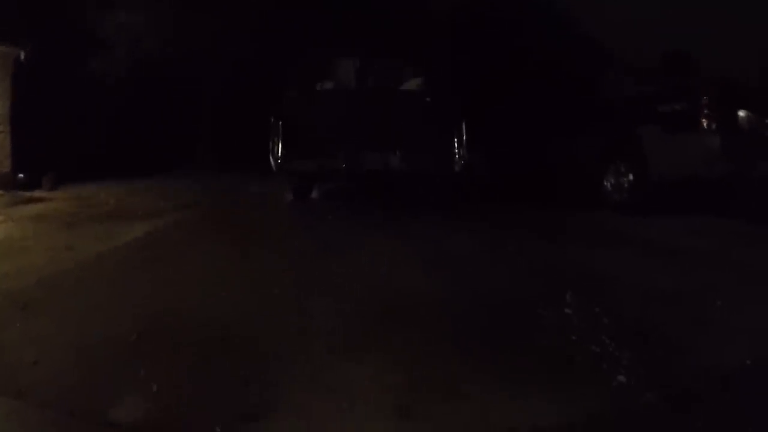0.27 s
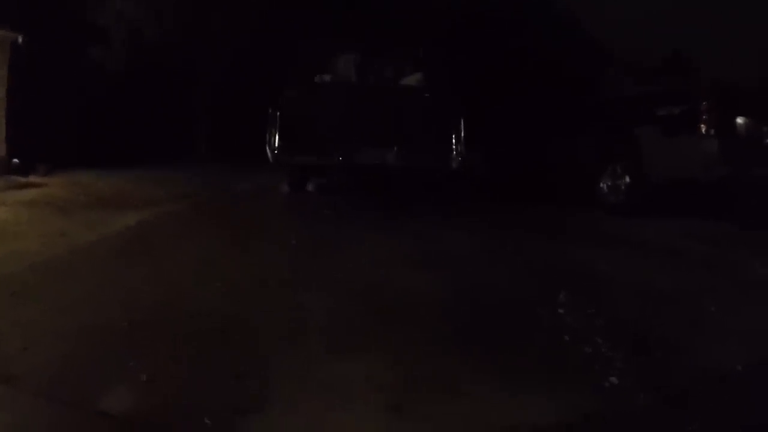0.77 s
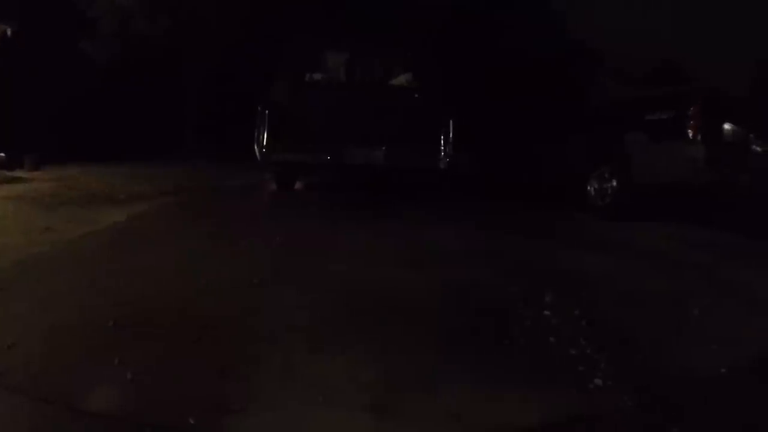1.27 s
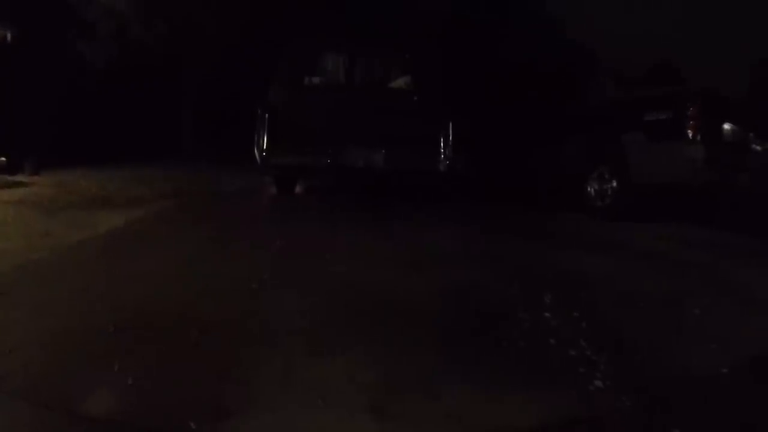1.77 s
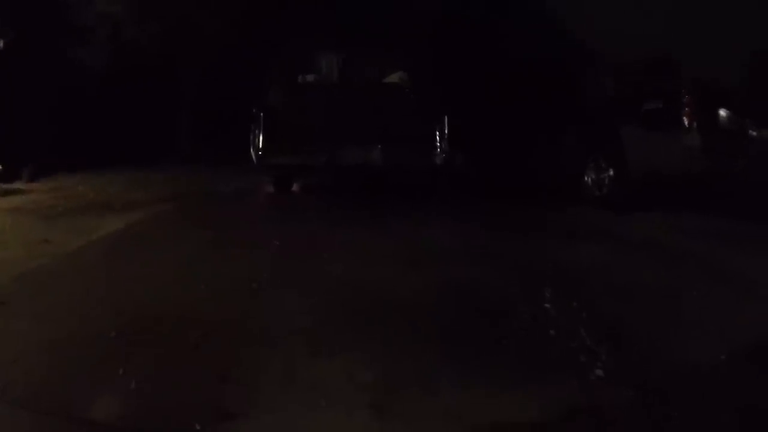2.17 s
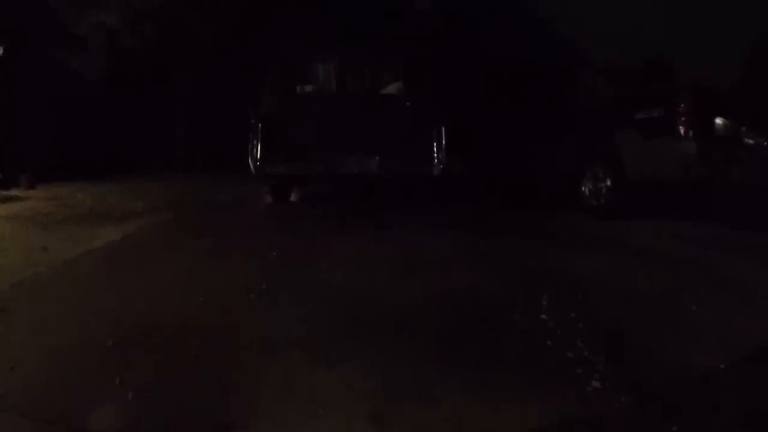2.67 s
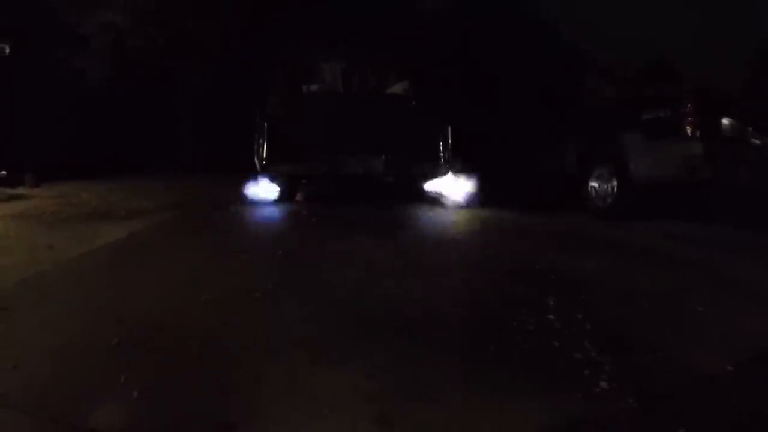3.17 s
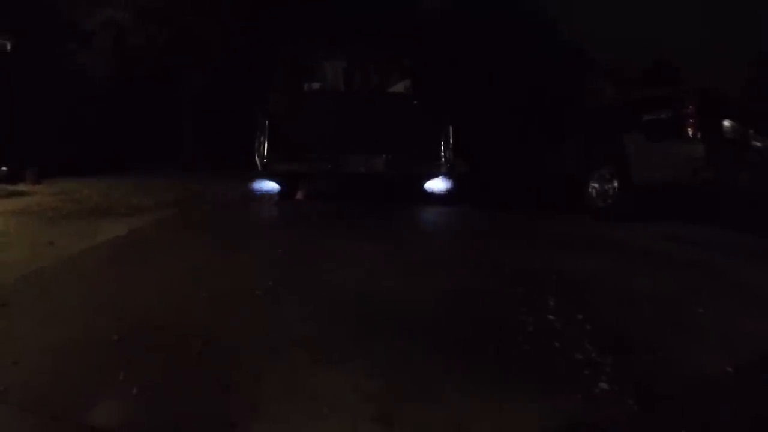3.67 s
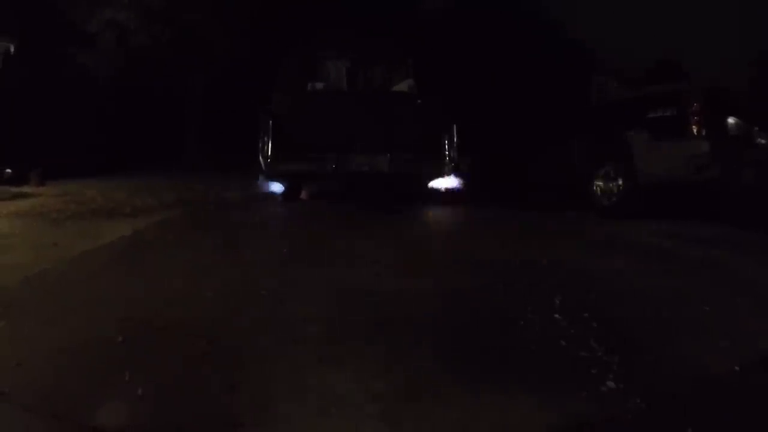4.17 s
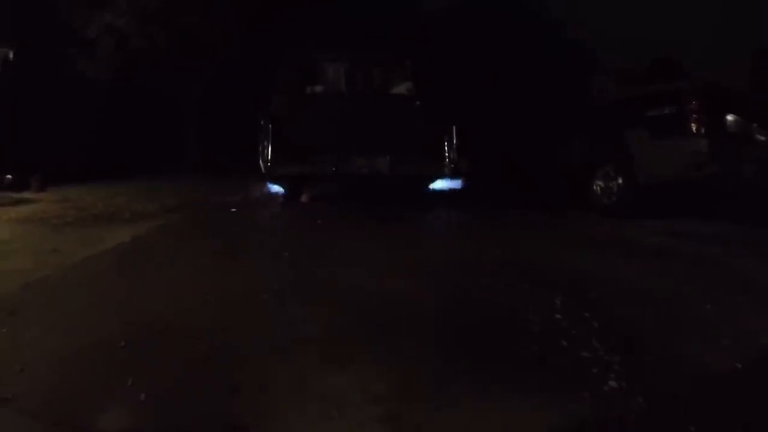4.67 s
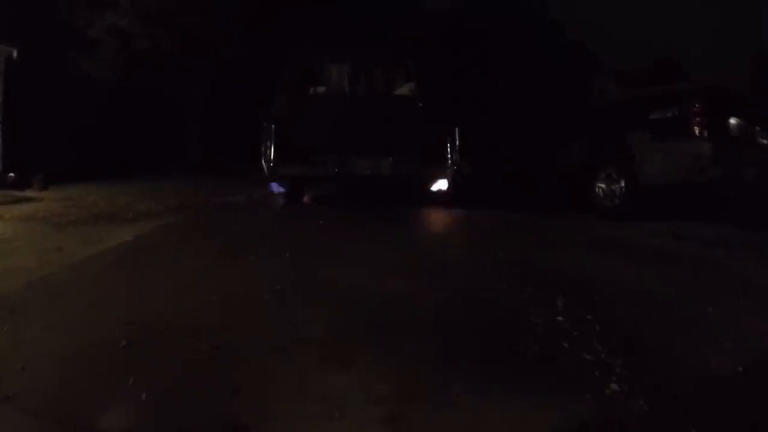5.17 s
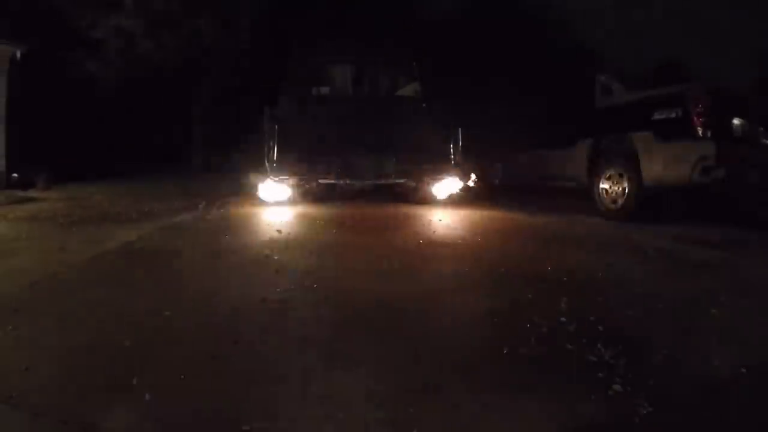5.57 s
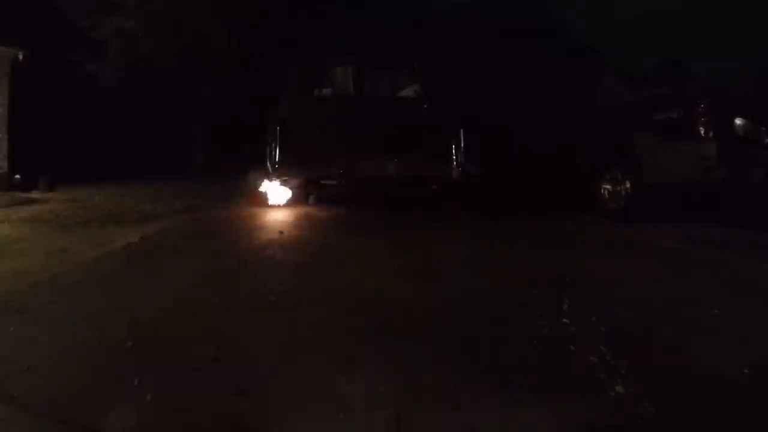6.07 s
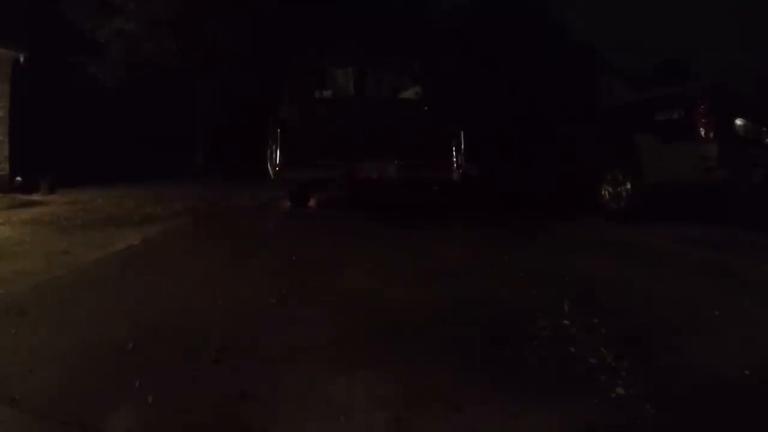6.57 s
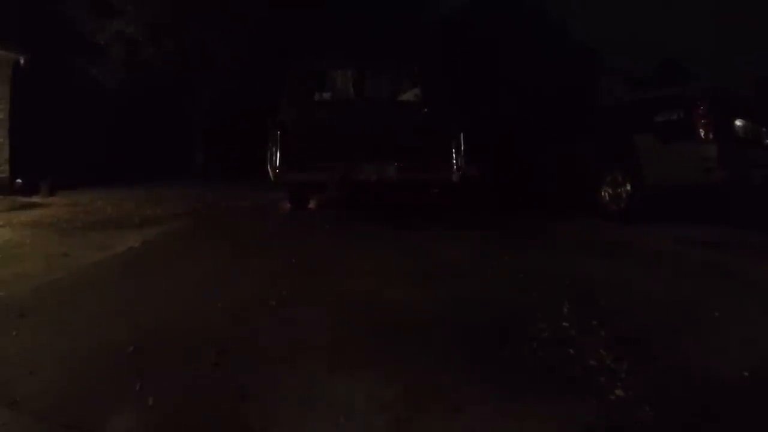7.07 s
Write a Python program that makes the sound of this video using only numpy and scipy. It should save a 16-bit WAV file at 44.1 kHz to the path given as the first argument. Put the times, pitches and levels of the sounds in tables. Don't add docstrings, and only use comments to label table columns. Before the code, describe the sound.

A V8 with loud twin exhaust pipes chugs at idle with small skipped beats, then is blipped up to a steady, rasping drone and a higher peak. Off throttle, the exhaust cracks violently and gargles with low popping bursts while the engine slows. After a few lumpy, hissing coughs, the throttle opens and the roar climbs again. Outdoor yard with faint night air, close dull reflections and clipped peaks from a small recorder.

```python
import sys
import numpy as np
from scipy import signal
from scipy.fft import rfft, irfft, next_fast_len
from scipy.io import wavfile
from scipy.ndimage import uniform_filter1d

SR = 44100
rng = np.random.default_rng(int(sys.argv[2]) if len(sys.argv) > 2 else 0)


def store_pcm(level_fs):
    pcm = np.round(np.clip(level_fs, -1, 1) * 32767).astype(np.int16)
    wavfile.write(sys.argv[1], SR, np.atleast_2d(pcm).T)


def linear_from_db(decibels):
    return 10 ** (np.asarray(decibels, float) / 20)


N = 323253

# f/Hz, level/dB
AIR_COLOUR = [(2940, -40.5), (5000, -3), (6800, -7), (9040, -8), (14300, -12.5), (15200, -9)]
# delay t/s, level/dB
ECHOES = [
    (.013, -17),
    (.029, -19),
    (.047, -21),
    (.083, -23),
]
# t/s, peak level/dB, ring f/Hz, deep thump level/dB, bright spit level/dB
POPS = [(.952, -9.5, 156, -3, -40), (1.024, -6, 131, -27, -8), (1.082, -3.5, 213, -21, -23),
        (2.753, 2.5, 197, -14, -21.5), (3.218, 13.5, 156, -6, -40), (3.5122, 3.5, 338, -19, -48),
        (3.541, -6, 362, -22, -53), (3.566, -1.5, 330, -6, -38), (3.601, -4, 175, -24, -45),
        (3.625, -2, 254, -8, -35), (3.6574, 5, 233, -8.5, -45), (3.684, -6, 300, -29, -50),
        (3.7, -6.5, 310, -21, -43), (3.843, -13.5, 254, -13, -44.5), (4.291, -21.5, 254, 11, -20),
        (4.6372, -6, 302, -23, -24), (4.643, -8, 80.6, 11.5, -54), (4.716, -6, 219, -9, -50),
        (4.767, -4.5, 218, -16, -54), (4.797, 1.5, 195, -5, -41.5), (4.88, -11, 240, -13, -57),
        (4.932, -3.5, 87, 4.5, -47.5), (5.344, -9.5, 155, 6, -60)]
# t/s, level/dB
GAS_FLOW = [(0, -23), (.7, -20.5), (1.04, -19), (1.35, -29.5), (1.84, -34), (2.35, -27), (2.63, -32),
            (2.76, -24.5), (2.81, -30.5), (3.49, -39), (4.53, -50.5), (4.6, -35.5), (4.94, -26),
            (5.22, -51), (5.36, -29.5), (5.64, -17.5), (5.98, -28), (7.33, -29)]
# t/s, length/s, loss of flow/dB
MISFIRES = [
    (0.438, 0.079, 11),
    (0.585, 0.079, 8),
]
# t/s, length/s, boom level/dB, bark against boom/dB
FLARES = [
    (3.197, 0.11, -17, -2),
    (3.345, 0.23, -18.5, -3),
    (3.495, 0.21, -18, 0.5),
    (3.785, 0.22, -17.5, -6),
    (4.07, 0.28, -24, -3.5),
    (4.574, 0.11, -14.5, -4),
    (4.758, 0.16, -13.5, -2.5),
    (5.318, 0.23, -16.5, -10),
]
# t/s, full cycles per second/Hz (eight firings a cycle)
ENGINE_SPEED = [(0.0, 5.327), (0.8, 5.374), (1.0, 6.956), (1.27, 11.338), (1.5, 12.558), (2.24, 12.64),
                (2.45, 14.422), (2.81, 18.07), (3.125, 14.496), (4.5, 4.396), (4.95, 4.436), (5.47, 4.428),
                (5.8, 7.773), (6.32, 10.98), (6.72, 12.35), (6.92, 13.775), (7.2, 16.836), (7.33, 17.462)]
# t/s, uneven share of the boom/0-1, share of that burning late in the pipes/0-1
BURN = [(0, .3, .1), (.8, .3, .1), (1.1, .4, .1), (1.45, .05, 0), (2.3, .05, 0), (2.7, .25, 0),
        (2.85, .12, .25), (3.15, .15, .4), (3.25, .92, .96), (4.5, .95, .97), (4.6, .85, .75),
        (5.1, .85, .8), (5.3, .8, .45), (5.55, .3, .1), (5.9, .5, .1), (6.35, .45, .05), (6.6, .11, 0),
        (7.33, .11, 0)]
CYLINDER_JET = [-2.5, -13, -2, -1, -18.5, -3, -0.5, -8.5]
# f/Hz, level per Hz/dB
JET_COLOUR = [(760, -41.5), (1300, -19.5), (1580, -2.5), (2310, 0.5), (2590, 3.5), (3060, -1.5), (4660, -2),
              (6420, -5), (8830, -23), (11400, -24), (15200, -43)]
# f/Hz, width/Hz, level/dB
PANELS = [(1590, 50, 9.), (2540, 36, 4.5), (2790, 73, 6.5), (3700, 166, 8.), (4630, 100, 9), (5250, 84, 6),
          (6220, 83, 0.5)]
# t/s, peak level/dB, centre f/Hz
COASTING_PUFFS = [(3.216, -27, 1970), (3.5126, -38, 1590), (3.5421, -29, 2570), (3.6015, -27.5, 1540),
                  (3.657, -29, 1630), (3.6837, -30, 1560), (4.5748, -19, 2730), (4.645, -22.5, 1540),
                  (4.667, -21, 3420), (4.6954, -21, 1550), (4.724, -21.5, 2820), (4.7822, -21, 2300),
                  (4.81, -21.5, 2620), (4.8407, -30, 2750), (4.867, -19, 2950), (4.8915, -27, 2800),
                  (4.9193, -18, 3260), (4.9456, -21, 3750), (5.0257, -17, 2730), (5.1075, -30, 3400),
                  (5.2776, -24.5, 2930), (5.349, -44, 3000), (5.384, -17.5, 2720), (5.4128, -19.5, 4080),
                  (5.4437, -21, 1610), (5.4986, -23.5, 2080)]
# f/Hz, level per Hz/dB
PIPE_COLOUR = [(15, 6.5), (25, -37), (48, -19.5), (91, -2.5), (144, -7), (189, -10), (255, -16),
               (292, -11.5), (461, -18), (545, -25.5), (845, -25), (1020, -34.5), (1400, -45.5),
               (1820, -70.5), (3080, -120)]
# f/Hz, level per Hz/dB
AFTERBURN_COLOUR = [(20, -30.5), (45, -6.5), (95, -2), (150, -3), (215, -7), (290, -7), (420, 2.5),
                    (560, -10), (700, -21.5), (950, -47), (1400, -33), (2500, -72)]
# multiple of the cycle/1, level/dB
ENGINE_TONES = [(3, -9), (4, -28), (5, -2.5), (6, -22.5), (7, -11), (9, -27), (11, 3), (12, -6.5), (13, -4),
                (14, -7), (15, -9.5), (16, 2.5), (17, -6.5), (19, 0.5), (20, -16), (21, -28), (22, -27),
                (23, -21.5), (24, 0), (25, -19.5), (27, -10.5), (29, -5.5), (30, -37), (31, -5.5), (32, -7),
                (35, -5), (37, -7.5), (40, -25)]
# f/Hz, level/dB
IN_STEP = [(40, -35), (87, 4.5), (105, 3), (120, 10.5), (140, -6), (170, -21), (200, 2.7), (225, -16.5),
           (280, -7), (400, -12), (700, -4)]
# f/Hz, level/dB
OPPOSED = [(25, -16), (45, -19), (60, 0), (72, -9), (100, -1), (125, -7), (142, 1.5), (185, 2), (205, 0),
           (240, -1.5), (270, -1), (400, -6.5), (700, -14.5)]
# f/Hz, level/dB
FIRING_TONE = [(36, -13.5), (43, -19.5), (54, -7.5), (70, -20.5), (93, -14), (101, -18), (109, -14.5),
               (140, -15)]


def at_hz(points, hz):
    table_hz, table_db = np.array(points).T[:2]
    return np.interp(np.log(hz + 1), np.log(table_hz), table_db)


def in_time(rows):
    s, *columns = np.transpose(rows)
    return [np.interp(np.arange(N) / SR, s, column) for column in columns]


def coloured(x, shape_db):
    size = next_fast_len(N + SR)
    hz = np.arange(size // 2 + 1) * SR / size
    cepstrum = irfft(shape_db(hz) * np.log(10) / 20, size)
    cepstrum[1:size // 2] *= 2
    cepstrum[size // 2 + 1:] = 0
    response = np.exp(rfft(cepstrum))
    return irfft(rfft(x, size) * response, size)[:N]


def band(x, lo_hz, hi_hz):
    sos = signal.butter(2, [lo_hz, min(hi_hz, .45 * SR)], "band", fs=SR, output="sos")
    return signal.sosfilt(sos, x)


def evened(x, span_s):
    span = int(span_s * SR)
    power = uniform_filter1d(uniform_filter1d(x ** 2, span), span)
    return x / np.sqrt(power + 1e-12)


def swell(clicks, rise_s, fall_s):
    a, b = np.exp(-1 / (rise_s * SR)), np.exp(-1 / (fall_s * SR))
    falling = signal.lfilter([1], [1, -b], clicks + 1e-18)
    return signal.lfilter([1 - a], [1, -a], falling)


def drift(rate_hz, count):
    knots = rng.standard_normal((count, int(N / SR * rate_hz) + 3))
    place = np.arange(N) / SR * rate_hz
    return 1.2 * np.array([np.interp(place, np.arange(len(k)), k) for k in knots])


def air():
    lit_s, out_s, fade_s = 3.22, 4.6, .04
    t = np.arange(N) / SR
    x = coloured(rng.standard_normal(N), lambda hz: at_hz(AIR_COLOUR, hz))
    burning = (t > lit_s) * np.exp(-np.maximum(t - out_s, 0) / fade_s)
    lift_db = (8 + 5 * (t - out_s)) * burning
    return linear_from_db(-71 + lift_db) * x / np.std(x)


def yard(x):
    dull = band(x, 60, 700)
    out = x
    for s, db in ECHOES:
        out = out + linear_from_db(db) * np.r_[np.zeros(int(s * SR)), dull][:N]
    return out


def pops():
    out, t = np.zeros(N + SR), np.arange(int(.1 * SR)) / SR
    noise = band(rng.standard_normal((30, len(t))), 500, 5000)
    thump_hz, thump_s, spit_s = 59, 0.013, 0.0025
    thump = -np.sin(2 * np.pi * thump_hz * t) * np.exp(-t / thump_s)
    for (s, db, hz, thump_db, spit_db), spit in zip(POPS, noise):
        shock = np.sin(2 * np.pi * hz * t) * np.exp(-((t * hz - .65) / .5) ** 2)
        fading_spit = spit * np.exp(-t / spit_s)
        pop = shock + linear_from_db(thump_db) * thump + linear_from_db(spit_db) * fading_spit
        out[int(s * SR):][:len(t)] += linear_from_db(db) * pop
    return out[:N]


def exhaust():
    t = np.arange(N) / SR
    missed_db = 0
    for s, length, db in MISFIRES:
        missed_db = missed_db + db * np.clip(np.minimum(t - s, s + length - t) / 0.004, 0, 1)
    flow_db = in_time(GAS_FLOW)[0] - missed_db
    swing_db = flow_db + 0.42 * missed_db + 26
    shut = np.minimum(in_time(BURN)[1], .3)
    faster = in_time(ENGINE_SPEED)[0] - 10
    boom = linear_from_db(-13.5 + 0.34 * swing_db - 21.5 * shut) ** 2
    bark = linear_from_db(-20.5 + 0.78 * swing_db + 0.86 * faster - 24 * shut) ** 2
    rise_s, fall_s = 0.021, 0.15
    for s, length, db, bark_db in FLARES:
        rise = np.clip((t - s) / rise_s, 0, 1)
        fall = np.exp(-np.maximum(t - s - length, 0) / fall_s)
        flare = (rise * fall) ** 2
        boom = boom + flare * linear_from_db(db) ** 2
        bark = bark + flare ** 2 * linear_from_db(db + bark_db) ** 2
    return 10 * np.log10(boom), 10 * np.log10(bark), flow_db


def firings():
    count = np.floor(8 * np.cumsum(in_time(ENGINE_SPEED)[0]) / SR).astype(int)
    at = np.flatnonzero(np.diff(count, prepend=-1))
    jet_db = np.take(CYLINDER_JET, count[at] % 8)
    return at, jet_db, rng.standard_normal((len(at), 4))


def hiss(flow_db, at, jet_db, luck):
    def colour(hz):
        rings = sum(db / (1 + (2 * (hz - f) / width) ** 2) for f, width, db in PANELS)
        return at_hz(JET_COLOUR, hz) + rings

    jet = coloured(rng.standard_normal(N), colour)
    jet /= np.std(jet)
    beats = np.zeros(N)
    beats[at] = linear_from_db(2 * luck[:, 1] + jet_db)
    throb = evened(.25 + swell(beats, .003, .006), .15)

    uneven, after = in_time(BURN)
    steady = after[at] < .2
    scatter = .3 + 2 * uneven[at]
    fired_s = np.maximum(at / SR - .002, .001)
    fired_db = flow_db[at] + 6.5 + jet_db + 1.5 * scatter * luck[:, 2]
    fired_hz = 2800 * 2 ** (.6 * luck[:, 3])
    fired = np.c_[fired_s, fired_db, fired_hz]
    s, db, centre_hz = np.r_[COASTING_PUFFS, fired[steady]].T
    puff_at = ((s - .001) * SR).astype(int)

    bed_db = -6.5 + 4 * np.minimum(4 * after, 1)
    edges = np.geomspace(1250, 15000, 13)
    out, chance = 0, rng.standard_normal((len(s), 12))
    for k, (lo_hz, hi_hz) in enumerate(zip(edges, edges[1:])):
        octaves = np.log2(np.sqrt(lo_hz * hi_hz) / 2500)
        bed_tilt_db = octaves * (0.033 * (flow_db + 49.0) - 5.5)
        bed = throb * linear_from_db(flow_db + bed_db + bed_tilt_db)
        favoured_db = 4 * np.exp(-(np.log2(centre_hz / 2500) - octaves) ** 2 / .1)
        scatter_db = 2.5 * np.clip(chance[:, k], -2, 1.3)
        puff_tilt_db = octaves * (0.94 + 0.16 * (db + 17.0))
        clicks = np.zeros(N)
        clicks[puff_at] = linear_from_db(db - 0.92 + puff_tilt_db + favoured_db + scatter_db)
        puffs = swell(clicks, .004, .0065)
        out = out + (bed + puffs) * band(jet, lo_hz, hi_hz)
    return out


def roughness(boom_db, bark_db, at, jet_db, luck):
    slips, beats = np.zeros(N), np.zeros(N)
    slips[at] = np.diff(luck[:, 0], 2, prepend=[0, 0])
    beats[at] = linear_from_db(0.83 * jet_db)
    rasp = swell(beats, 0.00083, 0.016) * rng.standard_normal(N)
    lit = rng.random(N) < 900 / SR
    lumps = lit * rng.standard_normal(N) * linear_from_db(0.41 * drift(23, count=1)[0])
    lumps = coloured(lumps, lambda hz: at_hz(AFTERBURN_COLOUR, hz))
    slips = coloured(slips, lambda hz: at_hz(PIPE_COLOUR, hz))
    rasp = coloured(rasp, lambda hz: at_hz(PIPE_COLOUR, hz))
    uneven, after = in_time(BURN)
    unlocked = np.minimum(.2 + 2 * uneven, 1)
    layers = ((slips, 25, 260, linear_from_db(boom_db + 0.77) * np.sqrt(uneven)),
              (rasp, 260, 1400, linear_from_db(bark_db + 0.87) * np.sqrt(unlocked)),
              (rasp, 520, 1400, linear_from_db(bark_db - 14) * np.sqrt(1 - unlocked)))
    out = 0
    for source, lo_hz, hi_hz, gain in layers:
        fired = evened(band(source, lo_hz, hi_hz), 0.039)
        burnt = evened(band(lumps, lo_hz, hi_hz), 0.023)
        out = out + gain * (np.sqrt(1 - after) * fired + np.sqrt(after) * burnt)
    return out


def tones(boom_db, flow_db):
    cycle_hz, = in_time(ENGINE_SPEED)
    uneven, after = in_time(BURN)
    turn = 2 * np.pi * np.cumsum(cycle_hz) / SR
    sway = drift(7, count=len(ENGINE_TONES))
    start = rng.uniform(0, 2 * np.pi, len(ENGINE_TONES))
    others = 0
    for (k, db), chance, phase in zip(ENGINE_TONES, sway, start):
        opposed = k % 8 > 0
        pipe_db = at_hz(OPPOSED if opposed else IN_STEP, k * cycle_hz)
        shut_db = np.minimum(after, .3) * (80 - 8 * k)
        waver_db = (1 + 5 * uneven) * chance
        smear_db = 0.7 * k * np.maximum(uneven - .3, 0)
        gain = linear_from_db(db + pipe_db + shut_db + waver_db - smear_db)
        others = others + gain * np.cos(k * turn + phase * opposed)
    firing_db = at_hz(FIRING_TONE, 8 * cycle_hz) + 0.44 * np.minimum(flow_db + 32, 0) - 24 * after
    firing = np.sqrt(2) * linear_from_db(firing_db) * np.cos(8 * turn)
    return firing + linear_from_db(boom_db - 3.5) * np.sqrt(1 - uneven) * others


def scene():
    boom_db, bark_db, flow_db = exhaust()
    at, jet_db, luck = firings()
    engine = tones(boom_db, flow_db) + roughness(boom_db, bark_db, at, jet_db, luck)
    jets = hiss(flow_db, at, jet_db, luck)
    return (engine + jets + yard(pops()) + air())[None]


def low_pass(x):
    return signal.sosfilt(signal.butter(12, 15400, fs=SR, output="sos"), x)


def record(dry):
    top, knee = .96, 4.5
    closing = np.minimum(np.arange(N)[::-1] / (.004 * SR), 1)
    dry = dry * closing
    mix = dry / (1 + abs(dry / top) ** knee) ** (1 / knee)
    return low_pass(mix)


dry = scene()
out = record(dry)
store_pcm(out)
```